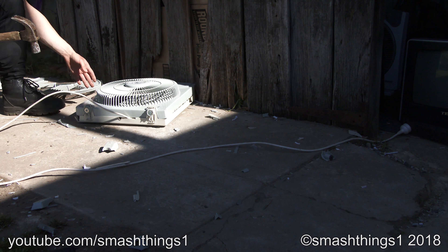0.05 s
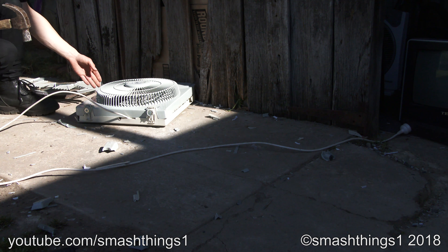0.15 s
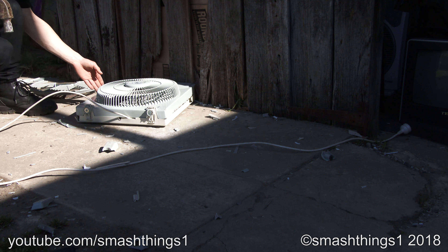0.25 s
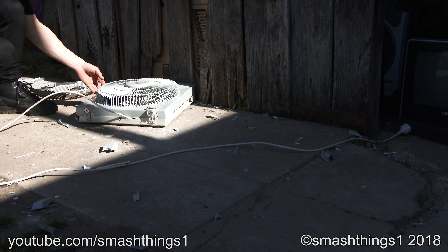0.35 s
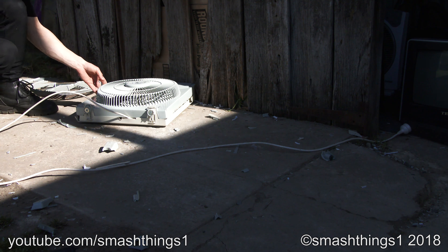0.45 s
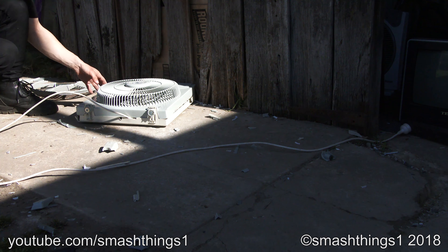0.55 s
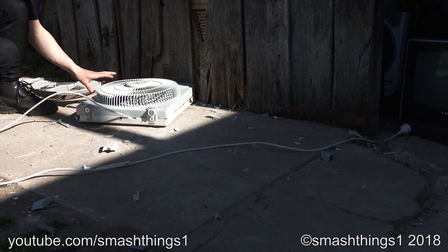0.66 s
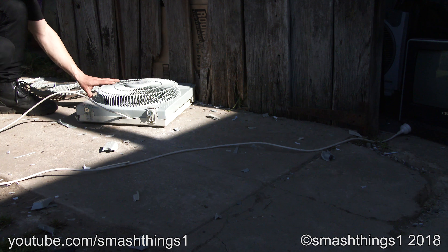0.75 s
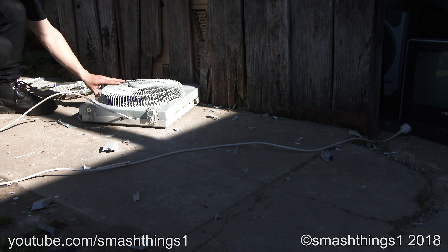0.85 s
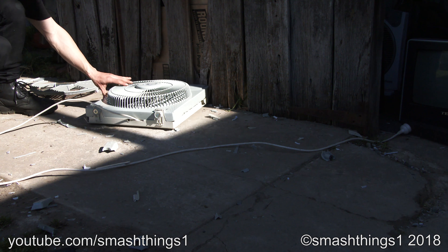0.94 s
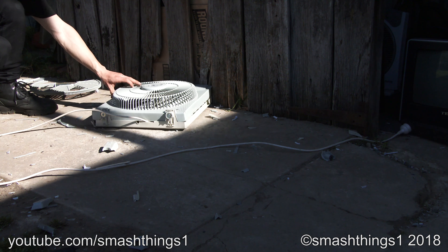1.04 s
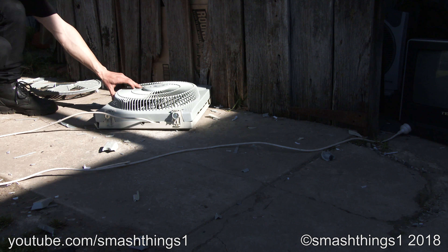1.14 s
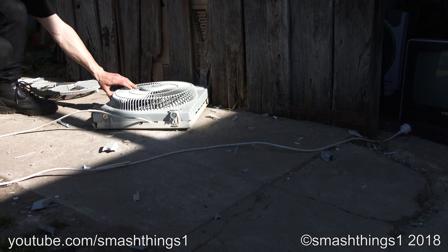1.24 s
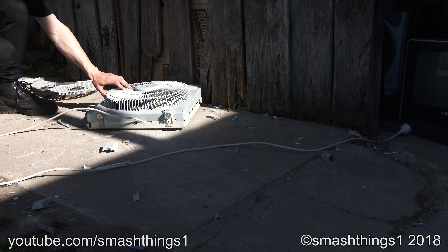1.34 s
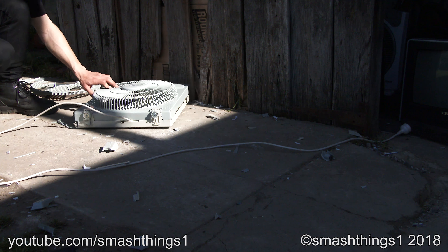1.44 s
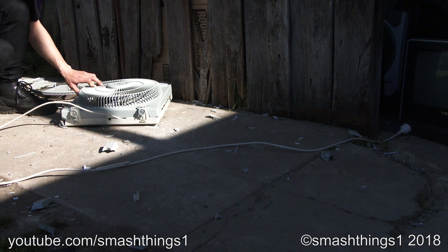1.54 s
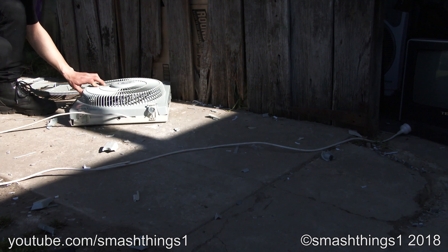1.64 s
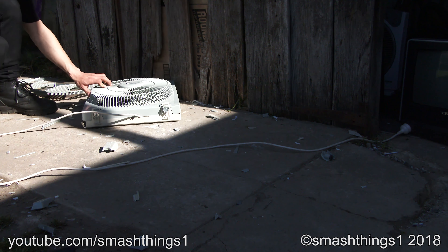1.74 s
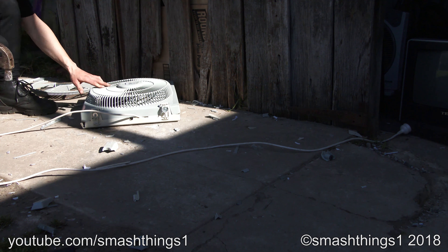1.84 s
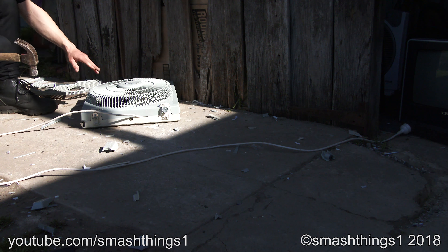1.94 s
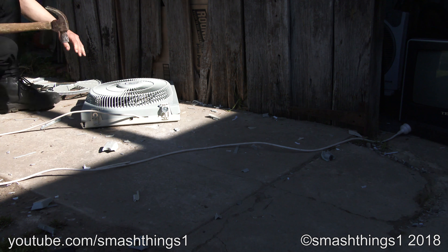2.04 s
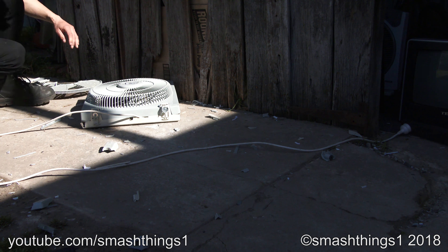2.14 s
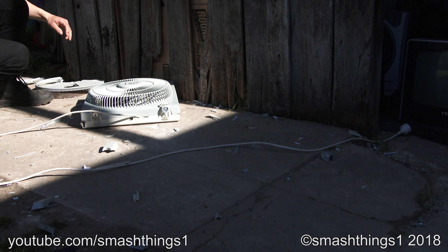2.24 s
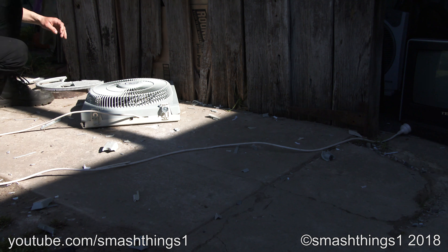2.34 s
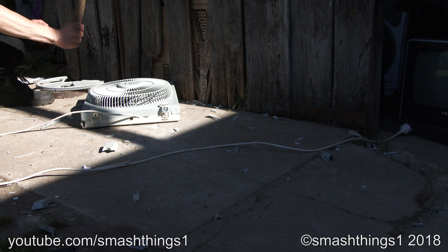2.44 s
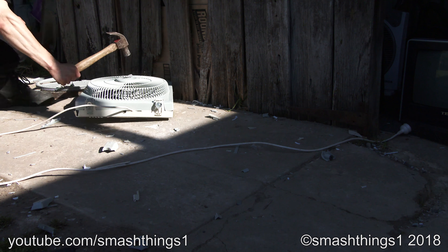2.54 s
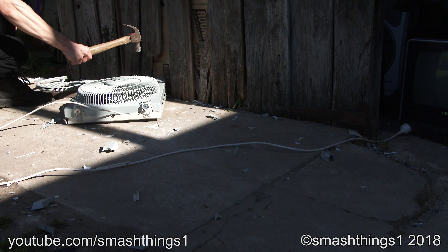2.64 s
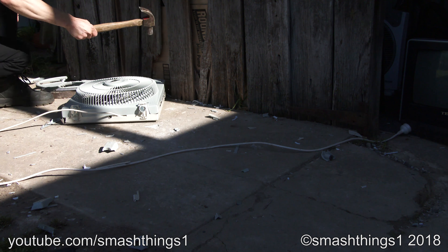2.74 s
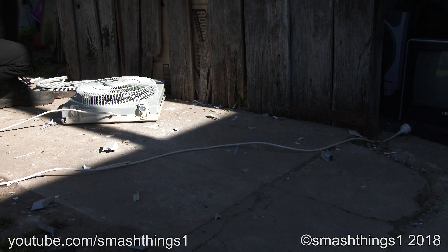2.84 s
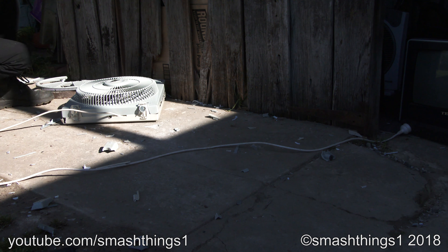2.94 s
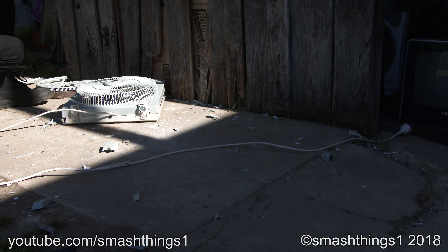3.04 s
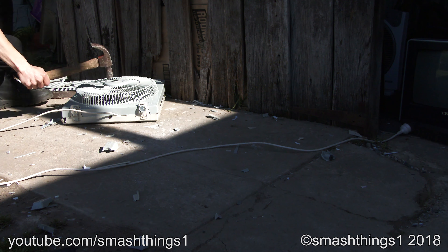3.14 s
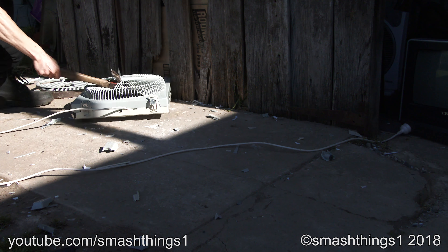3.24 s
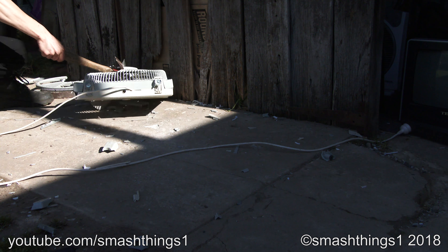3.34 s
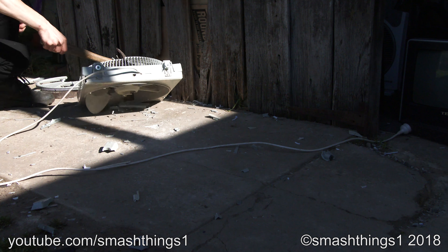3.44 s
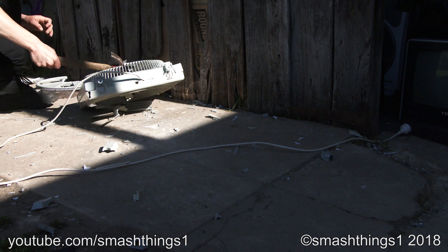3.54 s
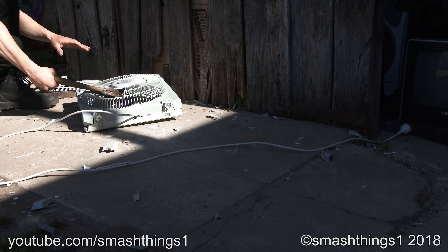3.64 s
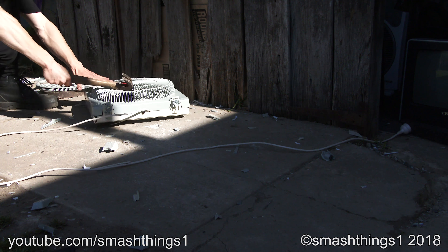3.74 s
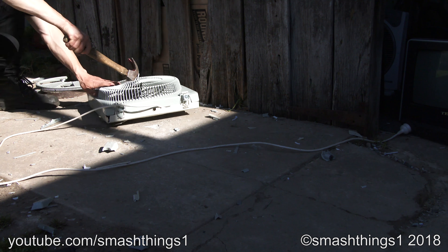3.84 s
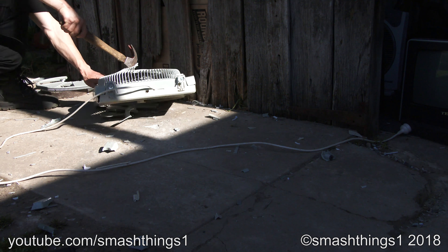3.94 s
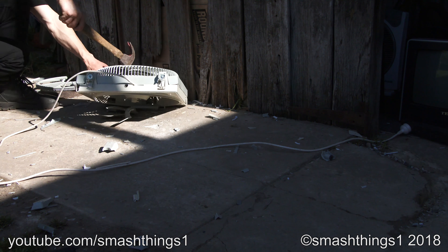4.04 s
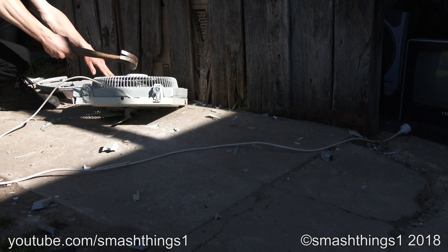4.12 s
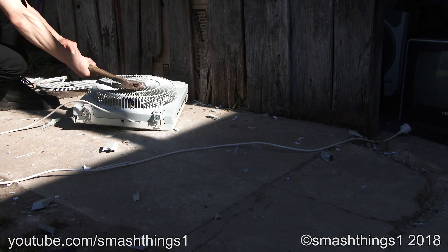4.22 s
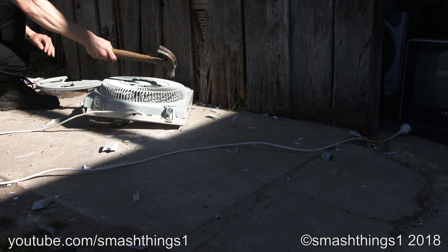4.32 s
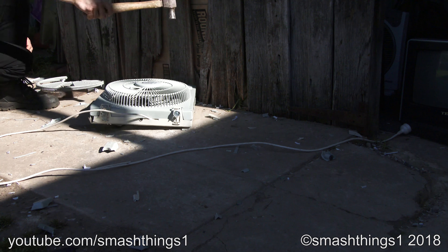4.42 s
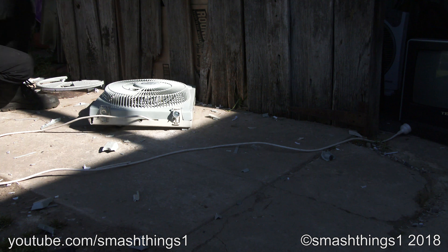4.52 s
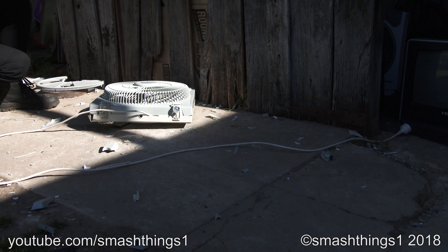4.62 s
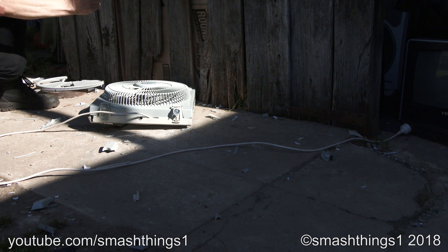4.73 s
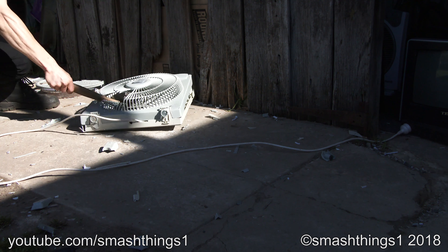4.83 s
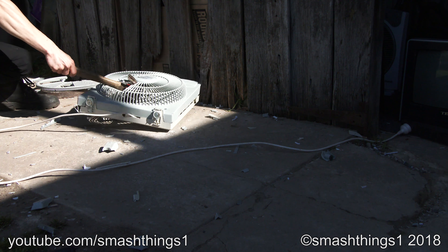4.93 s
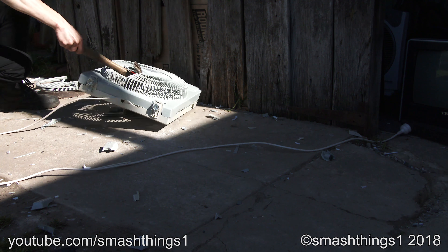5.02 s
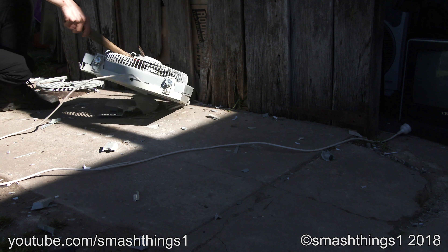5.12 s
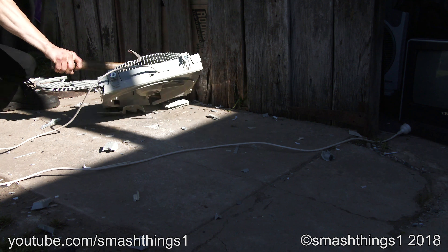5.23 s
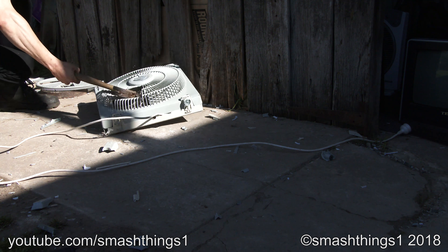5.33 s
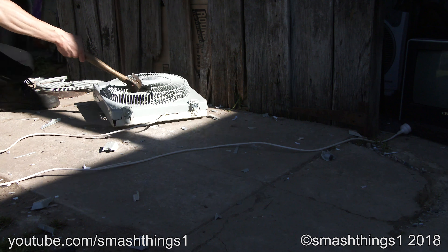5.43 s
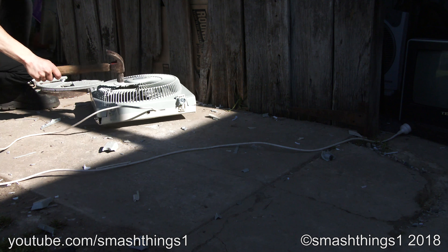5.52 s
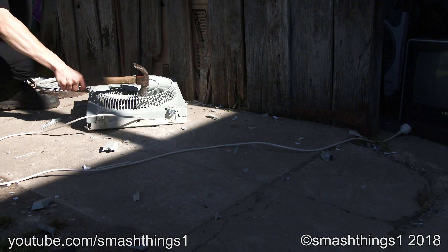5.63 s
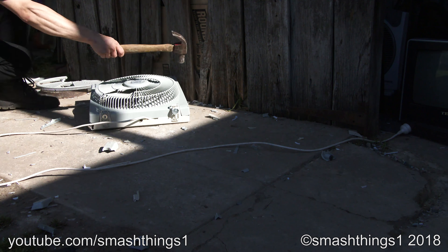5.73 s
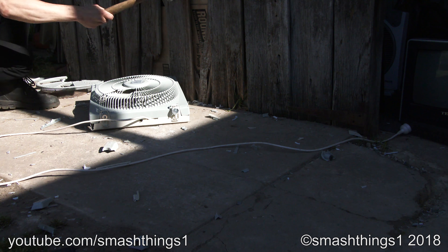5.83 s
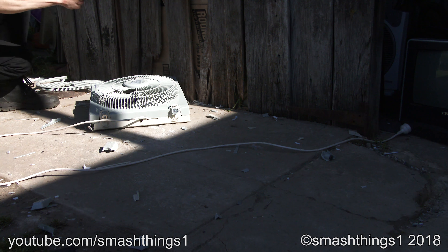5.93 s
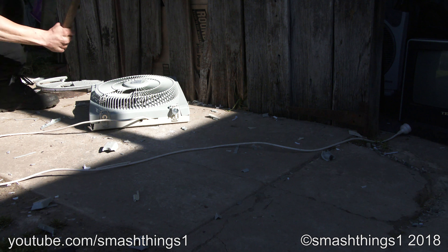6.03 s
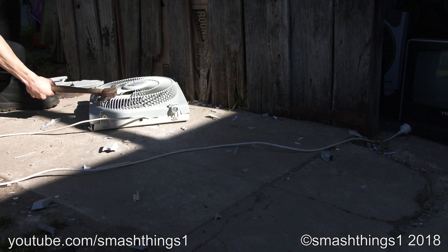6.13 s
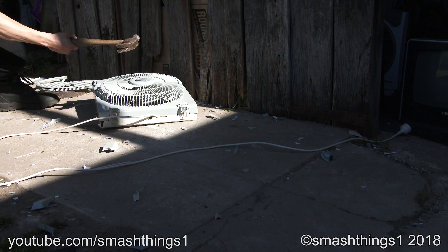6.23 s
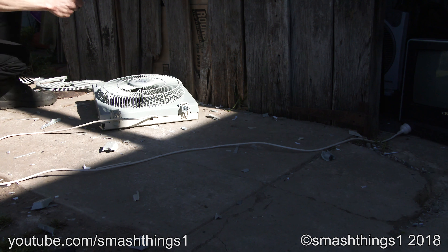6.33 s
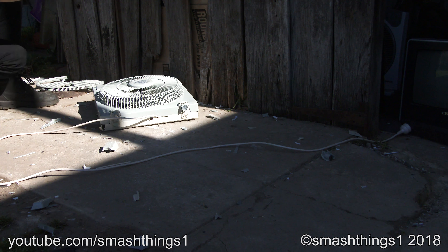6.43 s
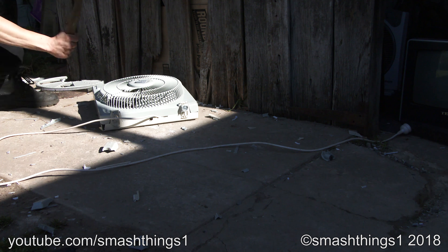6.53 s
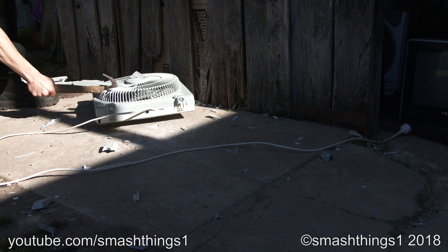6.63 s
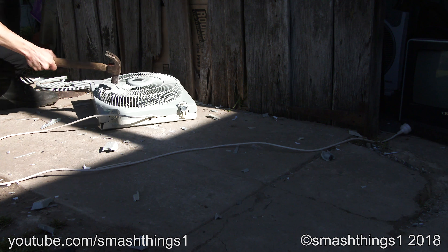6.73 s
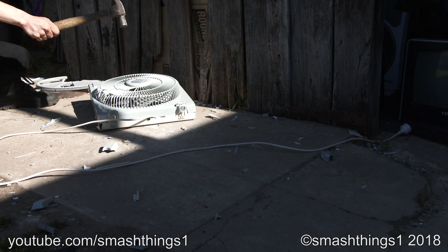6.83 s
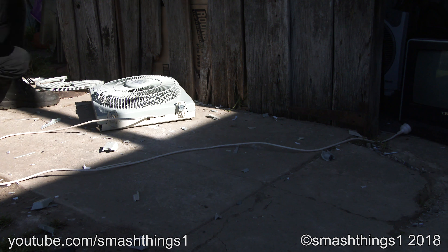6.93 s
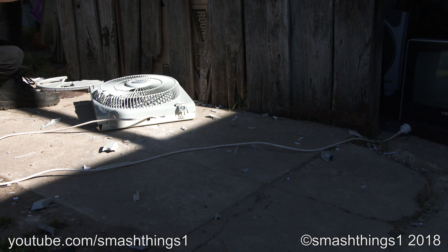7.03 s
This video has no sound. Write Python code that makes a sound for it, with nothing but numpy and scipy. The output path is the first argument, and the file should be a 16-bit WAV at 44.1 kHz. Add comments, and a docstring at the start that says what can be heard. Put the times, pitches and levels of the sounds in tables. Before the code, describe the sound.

Hard plastic drags gritty over a slab, then hammer blows crack and bounce a hollow fan case, loose parts rattling, a distant bird whistling.

```python
"""Plastic scrapes over concrete, then five hard cracks ring out with clatter and rattling; a bird whistles far off.
A plastic box fan lies in a fenced yard. It is dragged into place, then struck five times with a claw hammer.
The case cracks, lifts on the claw, drops back and rattles. Bursts of tiny snaps, slips and ticks drive
the ringing of the case; shaped noise makes air, scuff and rumble, and wavering tones make the bird.
Scattered echoes of the yard surround the fan and the bird."""
import sys
import numpy as np
from scipy import signal
from scipy.fft import rfft, irfft, next_fast_len
from scipy.io import wavfile

SR = 44100
rng = np.random.default_rng(int(sys.argv[2]) if len(sys.argv) > 2 else 0)


def output_pcm(signal):
    """Save a mono or channel-first signal as 16-bit PCM at the path in sys.argv[1].

    Samples are clipped to [-1, 1] before scaling.
    """
    pcm = np.clip(np.atleast_2d(signal).T, -1, 1) * 32767
    wavfile.write(sys.argv[1], SR, np.round(pcm).astype(np.int16))


N = 311787
TIME = np.arange(N) / SR

# four ranges of pitch, called registers, for thud, knock, clack and crack: (low f/Hz, high f/Hz)
REGISTER_BANDS = [(95, 468), (450, 2186), (1900, 5800), (6000, 14900)]
# hammer blows: the face cracks the grille, then the case slams onto the slab:
# (t/s, grille f/Hz, crack level/dB, crumbling t60/s, slam delay/s, panel f/Hz, slam level/dB, extra bass/dB)
HAMMER_BLOWS = [(2.534, 3916, -23.5, 0.055, 0.0032, 1470, -20.5, 3.5),
                (3.206, 565, -21.5, 0.13, 0.011, 620, -26, -1),
                (4.8478, 1520, -21.5, 0.048, 0.012, 1460, -20.5, 0.5),
                (6.1483, 900, -25.5, 0.092, 0.0105, 1720, -23, -1.5),
                (6.635, 2100, -29.5, 0.12, 0.0062, 750, -21, -1)]


def from_db(db):
    """Turn decibels into a gain; t60 everywhere is the time to fade by 60 dB."""
    return 10 ** (np.asarray(db) / 20)


def rms_one(x):
    """Scale a sound to an average strength (rms) of 1."""
    return x / np.sqrt(np.mean(x ** 2) + 1e-20)


def energy_one(x):
    """Scale a response so that it passes white noise at unchanged power."""
    return x / np.sqrt(np.sum(x ** 2) + 1e-20)


def gains(rows):
    """Draw level curves as gains per sample, silent outside their span."""
    s, *columns = np.transpose(rows)
    inside = (TIME >= s[0]) * (TIME <= s[-1])
    return [from_db(np.interp(TIME, s, c)) * inside for c in columns]


def at_hz(points, hz):
    """Read a table between its points, with pitch spaced as the ear hears it (log frequency)."""
    f, value = np.transpose(points)
    return np.interp(np.log(hz), np.log(f), value)


def swell(start_s, rise_s, hold_s, t60):
    """Envelope that rises up to its start, holds and dies away."""
    t = TIME - start_s
    return np.clip(1 + t / rise_s, 0, 1) * from_db(-60 * np.maximum(t - hold_s, 0) / t60)


def butter(x, hz, kind, order=2):
    """Keep the lows, highs or a band with a Butterworth filter that looks only backwards in time."""
    return signal.sosfilt(signal.butter(order, hz, kind, fs=SR, output="sos"), x + 1e-18)


def resonance(x, hz, width_hz):
    """Ring at one pitch, with gain 1 at its top; a narrower resonance rings longer."""
    r = np.exp(-np.pi * width_hz / SR)
    feedback = [1, -2 * r * np.cos(2 * np.pi * hz / SR), r * r]
    return signal.lfilter(np.array([1, 0, -1]) * (1 - r * r) / 2, feedback, x)


def through(x, response):
    """Pass a sound through an impulse response."""
    return signal.oaconvolve(x, response)[:N]


def coloured(x, spectrum):
    """Tilt a sound's mix of pitches by a table; rms 1."""
    size = next_fast_len(N)
    hz = np.maximum(np.arange(size // 2 + 1) * SR / size, 1)
    return rms_one(irfft(rfft(x, size) * from_db(at_hz(spectrum, hz)), size)[:N])


def grains(size, per_s, spread_db):
    """Tiny snaps at random moments; a larger spread makes their strengths more uneven; rms 1."""
    out = np.zeros(size)
    born = np.flatnonzero(rng.random(size) < per_s / SR)
    strength, sign = rng.random((2, size))[:, born]
    extra_db = spread_db * np.minimum(-np.log(1 - strength), 4)
    out[born] = from_db(extra_db) * np.sign(sign - .5)
    return rms_one(out)


def air(level_db):
    """Steady faint outdoor noise: random pressure with more bass than treble."""
    # colour of outdoor air: (f/Hz, relative level per Hz/dB)
    air_colour = [(25, -2), (60, 1.5), (130, 6.5), (280, 2.5), (650, 3.5), (1200, 5), (2200, -5.5),
                  (3500, -10.5), (6500, -17), (12000, -22.5), (16000, -17.5)]
    return from_db(level_db) * coloured(rng.standard_normal(N), air_colour)


def yard(build_s=0.0052, dull_hz=5000):
    """Scattered echoes from fence and walls; the bass rings longest and the highest treble dies first."""
    # how long the yard rings: (f/Hz, t60/s)
    ring_times = [(100, 0.89), (700, 0.29), (2000, 0.35), (5000, 0.47), (13000, 0.13)]
    t = TIME[:SR]
    edges = np.geomspace(40, 18000, 10)
    tail = np.zeros(SR)
    for band in zip(edges, edges[1:]):
        t60 = at_hz(ring_times, np.sqrt(np.prod(band)))
        tail += butter(rng.standard_normal(SR), band, "band") * from_db(-60 * t / t60)
    return energy_one(butter(tail * (1 - np.exp(-t / build_s)), dull_hz, "low", order=1))


def sideways(t60=0.2, low_hz=220, top_hz=5200):
    """Early reflections off the fence and slab, which reach the two ears differently."""
    t = TIME[:SR // 5]
    fading = rng.standard_normal(len(t)) * from_db(-60 * t / t60)
    return energy_one(butter(fading, [low_hz, top_hz], "band", order=3))


def bird(rise_hz_per_s=130, waver_hz=32, flutter_db=4, rasp_db=-6, rasp_hz=(1900, 4000)):
    """Distant whistles: tones that rise slightly, waver and flutter, with a faint rasp around them."""
    # bird whistles: (t/s, length/s, f/Hz, level/dB)
    whistles = [(0.145, 0.076, 2060, -68.5), (0.302, 0.032, 2007, -71), (1.864, .11, 2096, -65),
                (1.971, 0.15, 2337, -61), (2.074, 0.11, 2420, -61), (2.892, 0.29, 2336, -74),
                (4.592, 0.23, 2084, -73.5), (4.695, 0.1, 3110, -71), (4.776, 0.1, 2370, -65.5),
                (5.798, 0.21, 2350, -75)]
    out = np.zeros(N)
    for s, length, pitch_hz, db in whistles:
        u = np.linspace(0, 1, int(length * SR))
        waver, flutter = rms_one(butter(rng.standard_normal((2, SR)), 50, "low"))[:, -len(u):]
        rasp = rms_one(butter(rng.standard_normal(SR), rasp_hz, "band", order=3))[-len(u):]
        hz = pitch_hz + rise_hz_per_s * length * (u - .5) + waver_hz * waver
        tone = from_db(flutter_db * flutter) * np.sin(2 * np.pi * np.cumsum(hz) / SR)
        fade_in_out = np.sqrt(np.abs(np.sin(np.pi * u)))
        start = int(s * SR)
        out[start:start + len(u)] += from_db(db) * fade_in_out * (tone + from_db(rasp_db) * rasp)
    return out


def grit(db=-79, per_s=22, band_hz=(3500, 14000), t60=0.03):
    """Tiny splinters and grains of sand keep settling, each a faint high tick of fading noise."""
    t = TIME[:SR // 10]
    tick = energy_one(butter(rng.standard_normal(len(t)) * from_db(-60 * t / t60), band_hz, "band", order=1))
    return from_db(db) * through(grains(N, per_s, spread_db=3), tick)


def scuff(start_s=2.184, hold_s=0.19, release_t60=0.38, db=-41, sag_db_per_s=35):
    """Grit grinds under a sole: a dense run of snaps that sags and then dies away."""
    # colour of the scuff: (f/Hz, relative level per Hz/dB)
    scuff_colour = [(180, -37.5), (300, -11.5), (656, -15), (749, -10), (946, -14), (2320, -3), (2650, -9),
                    (3350, -11), (10000, -23), (16000, -37.5)]
    pressure = swell(start_s, 0.014, hold_s, release_t60)
    level = from_db(db - sag_db_per_s * np.maximum(TIME - start_s, 0))
    return pressure * level * coloured(grains(N, per_s=15000, spread_db=4.5), scuff_colour)


def rumble(rise_s=0.037, t60=0.74, rub_db=0, grit_db=-13, low_hz=(65, 190)):
    """Case and feet shift their weight on the slab: a low rumble with a dull rub and a little grit."""
    # dull shifts of weight: (t/s, level/dB)
    weight_shifts = [(1.02, -56), (1.3, -72), (1.745, -50), (1.94, -53.5), (2.121, -70.5), (2.242, -63),
                     (2.47, -63.5)]
    weight = sum(from_db(db) * swell(s, rise_s, 0, t60) for s, db in weight_shifts)
    low, rub = rng.standard_normal((2, N))
    low = rms_one(butter(low, low_hz, "band"))
    rub = rms_one(butter(rub, [200, 700], "band"))
    fine_grit = rms_one(butter(grains(N, per_s=3000, spread_db=3), [1000, 9000], "band", order=1))
    return weight * (low + from_db(rub_db) * rub + from_db(grit_db) * fine_grit)


def chatter(per_s, spread_db, slip_s, ring_share, ring_q=13, count=22):
    """Uneven slips: each is a short flurry of grit and rings one small part of the case at its own pitch."""
    slips = grains(N, per_s, spread_db)
    slip_energy = signal.lfilter([1], [1, -np.exp(-1 / (slip_s * SR))], slips ** 2 + 1e-18)
    flurry = rms_one(np.sqrt(slip_energy))
    part = rng.integers(0, count, N)
    pitches = np.geomspace(450, 12000, count) * rng.uniform(.96, 1.04, count)
    rings = rms_one(sum(resonance(slips * (part == k) + 1e-18, hz, hz / ring_q)
                        for k, hz in enumerate(pitches)))
    snaps = np.array([grains(N, 9000, spread_db=2.5) for _ in REGISTER_BANDS])
    return np.sqrt(1 - ring_share) * flurry * snaps + np.sqrt(ring_share) * rings


def drag(brightening=0.35):
    """The feet of the case catch and slip on the concrete; the harder the pull, the brighter the grind."""
    # force of the drag, in two pulls: (t/s, level/dB)
    pulls = [(0.77, -55), (0.905, -49), (0.93, -39.5), (1.02, -43.5), (1.06, -42), (1.165, -35),
             (1.225, -61), (1.255, -48), (1.33, -44), (1.42, -38.5), (1.53, -31.5), (1.68, -37),
             (1.78, -34), (1.87, -55), (1.93, -59)]
    # colour of the drag: (thud level/dB, knock level/dB, clack level/dB, crack level/dB)
    drag_colour = (-18, -2, -7, -11.5)
    pull = gains(pulls)[0]
    # brightening is in dB of crack per dB of pull; the thud register moves half as far the other way
    exponent = brightening * np.linspace(-.5, 1, 4)[:, None]
    tilt = (pull / pull.max() + 1e-9) ** exponent
    slips = chatter(per_s=1200, spread_db=5.5, slip_s=0.0061, ring_share=0.21)
    return pull * tilt * from_db(drag_colour)[:, None] * slips


def rattle(colour_db=(-17, -3, -8, -14), hollow=0.17, settle_db=-18, settle_t60=0.67):
    """Loose plastic ticks while the case is shaken, and settles after each blow."""
    # shaking by hand or on the claw, one table a spell: (t/s, level/dB)
    shaking_spells = [
        [(0.0, -50), (0.08, -62.5), (0.3, -78)],
        [(3.38, -51), (3.55, -51.5), (3.86, -43.5), (4.13, -45), (4.35, -52.5), (4.54, -56.5), (4.62, -89)],
        [(5.18, -55.5), (5.5, -46.5), (5.59, -50.5), (5.65, -40.5), (5.76, -50.5), (5.83, -69)],
        [(6.3, -60), (6.55, -64.5), (6.83, -59), (7.07, -58.5)],
    ]
    shaken = sum(gains(spell)[0] for spell in shaking_spells)
    settling = np.zeros(N)
    for s, *_, after_s, _, slam_db, _ in HAMMER_BLOWS:
        settling += from_db(slam_db + settle_db) * swell(s + after_s, after_s, 0, settle_t60)
    loose = chatter(per_s=220, spread_db=2.5, slip_s=0.0072, ring_share=0.13, ring_q=31)
    ticks = np.hypot(shaken, settling) * from_db(colour_db)[:, None] * loose
    return ticks + hollow * resonance(ticks, 700, 300)  # light touches mostly stir the hollow of the case


def thumps(hz=62, width_hz=150, delay_s=0.0016, db=-51):
    """A heavy blow goes through the case into the slab: one damped low swing."""
    clicks = np.zeros(N)
    for s, *_, weight_db in HAMMER_BLOWS:
        clicks[int((s + delay_s) * SR)] = from_db(db + weight_db) * SR / width_hz
    return butter(resonance(clicks, hz, width_hz), 80, "low")


def case_responses(bass_hz=230, crack_top_hz=13000):
    """A snap plus the ringing of the case and grille, split into its four registers."""
    # ringing pitches of case and grille: (f/Hz, level against the snap/dB, t60/s)
    modes = [(437, -44, 0.0084), (548, -41, 0.018), (635, -38, 0.011), (661, -46.5, 0.08),
             (797, -37.5, 0.01), (960, -40, 0.013), (1100, -41.5, 0.04), (1334, -65.5, .03),
             (1650, -54.5, .03), (1720, -56.5, 0.21), (2800, -51, 0.014), (3673, -43.5, 0.012),
             (4340, -46, 0.033), (5760, -60, 0.012), (5920, -44, 0.031), (7290, -36.5, 0.013),
             (12500, -47.5, .012), (13800, -47, .012)]
    t = TIME[:SR // 4]
    body = sum(from_db(db - 60 * t / t60) * np.cos(2 * np.pi * hz * t) for hz, db, t60 in modes)
    body[0] += 1
    body = butter(body, bass_hz, "high", order=1)  # a small open box radiates little bass
    body = butter(body, crack_top_hz, "low", order=1)
    return [energy_one(butter(body, band, "band", order=3)) for band in REGISTER_BANDS]


def ribs(t, t60=0.013, count=9):
    """Every touch sets a different handful of grille ribs ringing."""
    hz = np.exp(rng.uniform(np.log(1800), np.log(15000), (count, 1)))
    strength = rng.choice([-1, 1], (count, 1)) * np.sqrt(hz / hz.mean() / count)
    return (strength * np.sin(2 * np.pi * hz * t)).sum(axis=0) * from_db(-60 * t / t60)


def touches(slam_t60=0.073, tap_t60=0.084, bump_t60=0.11, tick_t60=0.057):
    """List every contact as (t/s, panel f/Hz, level in each register/dB, t60/s)."""
    # the case knocks against concrete and hammer: (t/s, panel f/Hz, level/dB, hardness/dB, crumbling t60/s)
    knocks = [(0.92, 1110, -39, 1, 0.24), (1.096, 657, -33, 4, 0.082), (1.156, 980, -28.5, -1, 0.05),
              (1.304, 1070, -43.5, 10.5, 0.23), (1.46, 570, -33, 2, 0.18), (1.532, 1480, -33, 6, 0.34),
              (1.764, 1100, -38, -26, 0.14), (2.672, 1660, -26, -3, 0.049),
              (3.517, 710, -35.5, -2.5, 0.027), (3.602, 796, -37.5, 4, 0.076),
              (3.631, 704, -44.5, 5.5, 0.36), (3.679, 1440, -26, 2, 0.081),
              (3.721, 1100, -19.5, -0.5, 0.068), (3.867, 610, -31, 1.5, 0.12),
              (3.894, 690, -37.5, -6, 0.31), (4.021, 765, -34.5, 1, 0.23), (4.153, 610, -37, 3, 0.078),
              (4.254, 610, -27.5, 2.5, 0.11), (4.288, 3270, -18.5, -1, 0.032),
              (4.294, 590, -31, -2.5, 0.31), (4.338, 1140, -23, -9.5, 0.025), (4.417, 3500, -32, 5, 0.03),
              (4.423, 1380, -28.5, 4, 0.066), (4.995, 1720, -40, 8.5, 0.087), (5.276, 1310, -32.5, 9, 0.13),
              (5.281, 1520, -23.5, 2, 0.094), (5.3569, 1150, -20.5, 3.5, 0.075),
              (5.377, 1550, -32.5, 2.5, 0.14), (5.409, 630, -24, 6.5, 0.091),
              (5.638, 1010, -31.5, 0.5, 0.025), (5.675, 620, -32.5, 1, 0.18), (5.691, 650, -30, 5.5, 0.026),
              (6.298, 1100, -44.5, -2, 0.033), (6.749, 745, -33, 0.5, 0.048),
              (6.873, 770, -35.5, -5, 0.034), (6.987, 600, -40, -1, 0.032)]
    # loose parts tap the hollow case softly: (t/s, panel f/Hz, level/dB)
    taps = [(0.547, 940, -57.5), (0.772, 600, -53), (0.853, 1020, -48), (2.619, 1720, -41),
            (4.549, 652, -47.5), (4.64, 670, -56.5), (4.745, 634, -54.5), (4.783, 650, -56.5),
            (5.233, 587, -45), (5.72, 617, -39), (5.818, 1100, -56.5), (6.192, 710, -36),
            (6.322, 880, -43.5), (6.471, 2400, -46.5), (6.498, 670, -53), (7.03, 650, -56)]
    # the dragged case bumps over the slab: (t/s, panel f/Hz, level/dB)
    bumps = [(1.01, 550, -35), (1.718, 850, -36.5), (1.744, 810, -38.5), (1.763, 1100, -35)]
    # shards and grit tick: (t/s, f/Hz, level/dB)
    ticks = [(0.046, 2000, -60), (0.182, 4580, -57.5), (0.435, 2090, -76), (0.631, 10100, -79),
             (0.984, 4430, -42.5), (1.06, 680, -37.5), (1.424, 4300, -43.5), (1.629, 1030, -34.5),
             (1.839, 6060, -48), (1.883, 11600, -46), (2.18, 4270, -42), (2.188, 11990, -38),
             (2.222, 2020, -39), (2.268, 3450, -40.5), (2.889, 960, -70.5), (3.43, 4430, -46),
             (3.951, 685, -45.5), (4.084, 1420, -44), (4.166, 1340, -49.5), (6.364, 660, -51),
             (6.433, 6000, -59.5), (6.549, 5370, -64), (6.596, 1720, -58), (6.691, 7500, -51.5),
             (6.814, 654, -49)]
    # colour of each kind of contact: (thud level/dB, knock level/dB, clack level/dB, crack level/dB)
    crack_colour = (-19.5, -3.5, -4.5, -1.5)
    slam_colour = (-18, -1.5, -3.5, -6.5)
    knock_colour = (-22, -1.5, -8, -14.5)
    tap_colour = (-17, 0.5, -20, -28.5)
    bump_colour = (-3.5, -0.5, -8, -15)
    tick_colour = (-21.5, -9.5, -1.5, -4)
    # share of a knock's hardness that reaches each register: (thud, knock, clack, crack) [plain factors]
    hardness_share = (0.3, 0, 0.88, 1.5)
    for s, grille_hz, crack_db, t60, after_s, panel_hz, slam_db, weight_db in HAMMER_BLOWS:
        yield s, grille_hz, np.add(crack_colour, crack_db), t60
        yield s + after_s, panel_hz, np.add(slam_colour, slam_db) + [weight_db, 0, 0, 0], slam_t60
    for s, hz, db, hardness_db, t60 in knocks:
        yield s, hz, np.add(knock_colour, db) + np.multiply(hardness_share, hardness_db), t60
    for rows, colour, t60 in [(taps, tap_colour, tap_t60), (bumps, bump_colour, bump_t60),
                              (ticks, tick_colour, tick_t60)]:
        for s, hz, db in rows:
            yield s, hz, np.add(colour, db), t60


def contacts(panel_db=3, panel_q=5, snaps_per_s=9000, hold_s=0.004, rise_s=0.00052, impact=4, ribs_db=-3):
    """Each contact is one impact in a burst of snaps that dies away; it rings its panel and nearby ribs."""
    force = np.zeros((4, N))
    t = TIME[:SR // 7]  # a burst ends after a seventh of a second at most
    for s, panel_hz, levels_db, t60 in touches():
        snaps = np.array([grains(len(t), snaps_per_s, spread_db=0.0) for _ in REGISTER_BANDS])
        snaps *= from_db(-60 * np.maximum(t - hold_s, 0) / t60)
        snaps += from_db(ribs_db) * ribs(t)
        snaps *= 1 - np.exp(-t / rise_s)
        snaps[:, SR // 400] += impact * rng.choice([-1, 1])  # the plastic gives for an instant, then stops hard
        snaps += from_db(panel_db) * resonance(snaps, panel_hz, panel_hz / panel_q)
        burst = snaps * from_db(levels_db)[:, None]
        start = int(s * SR)
        force[:, start:start + len(t)] += burst[:, :N - start]
    return force


def scene(yard_db=-20, side_db=-20.5, bird_echo_db=-11, air_db=-74, air_side_db=-79.5,
          left_db=0.24, hollow_left=.07, grille_right=0.12):
    """The fan, its hollow sounding from the left and its grille from the right, with bird and air around it."""
    force = contacts() + drag() + rattle()
    fan = sum(through(f, response) for f, response in zip(force, case_responses())) + thumps()
    song = bird()
    echoes = through(from_db(yard_db) * fan + from_db(bird_echo_db) * song, yard())
    mid = fan + grit() + scuff() + rumble() + song + echoes + air(air_db)
    # the side signal is added on the left and subtracted on the right
    side = from_db(side_db) * through(mid, sideways()) + air(air_side_db)
    side += hollow_left * resonance(fan, 520, 500) - grille_right * resonance(fan, 4000, 2500)
    return np.array([mid + side, mid - side]) * from_db([[left_db], [-left_db]])


def record(dry, ceiling=0.59, cutoff_hz=16000):
    """Round the loudest peaks towards the ceiling, then cut the treble above the cutoff."""
    rounded = ceiling * np.tanh(dry / ceiling)
    return signal.sosfilt(signal.ellip(10, .1, 80, cutoff_hz, fs=SR, output="sos"), rounded)


dry = scene()
out = record(dry)
output_pcm(out)
```